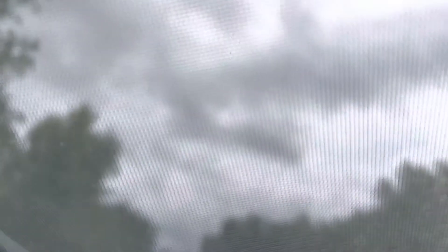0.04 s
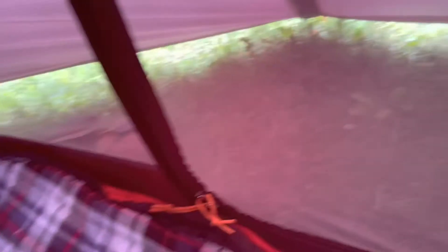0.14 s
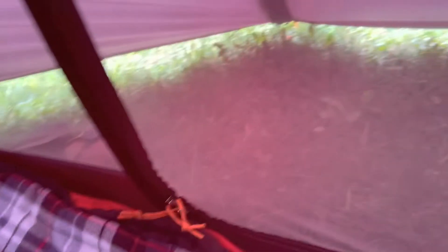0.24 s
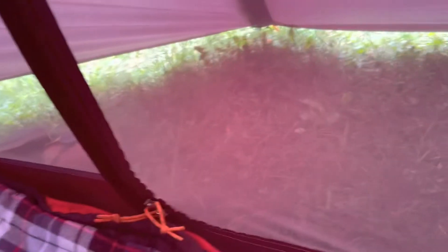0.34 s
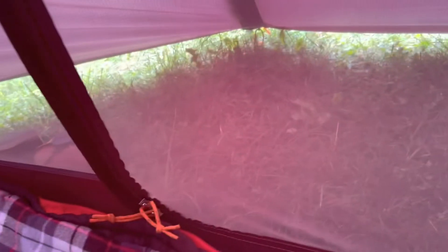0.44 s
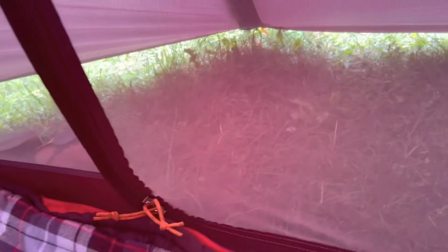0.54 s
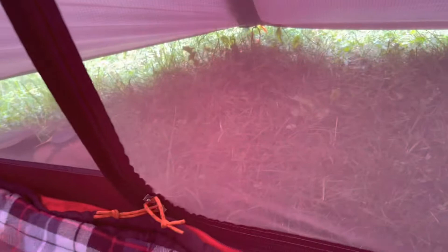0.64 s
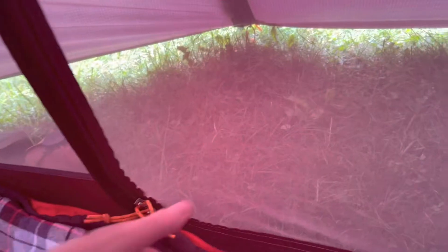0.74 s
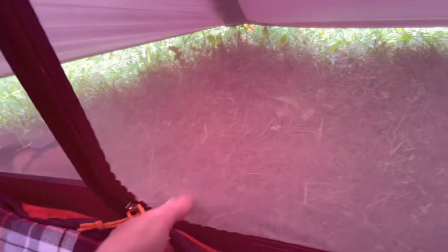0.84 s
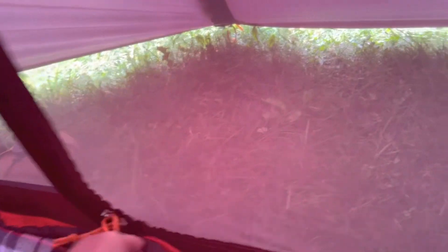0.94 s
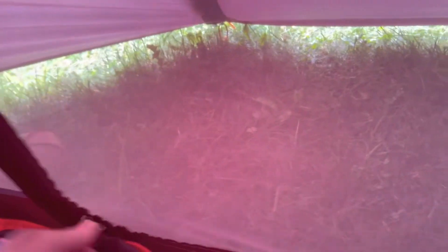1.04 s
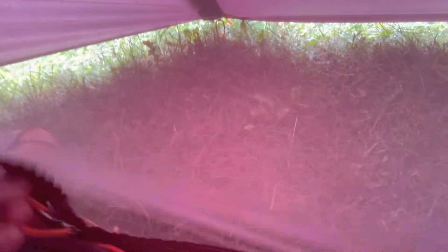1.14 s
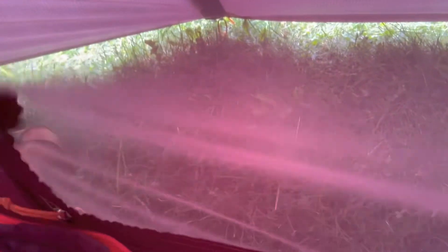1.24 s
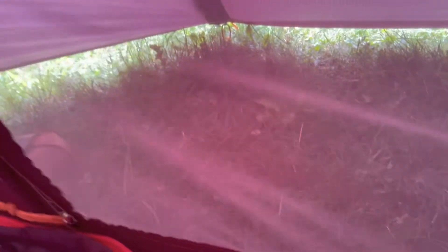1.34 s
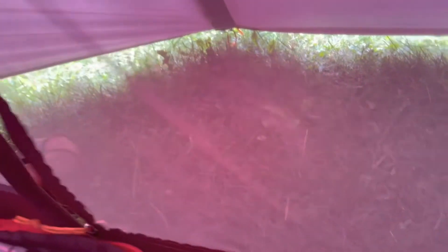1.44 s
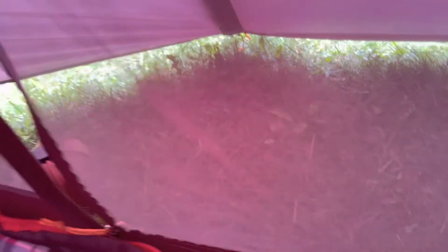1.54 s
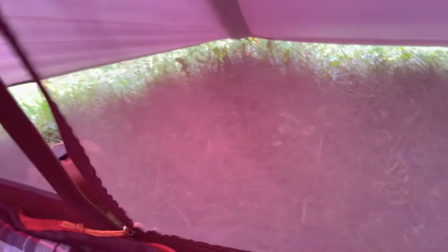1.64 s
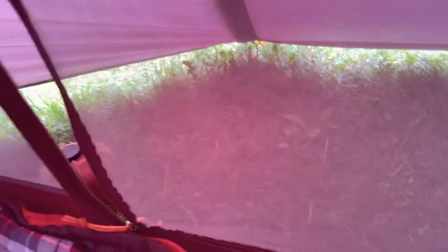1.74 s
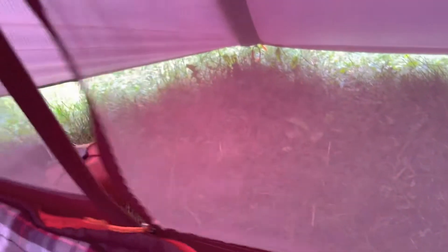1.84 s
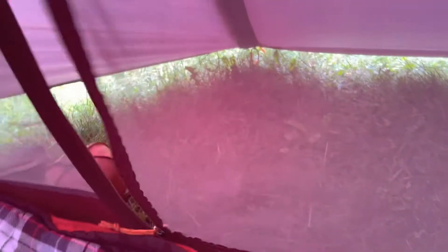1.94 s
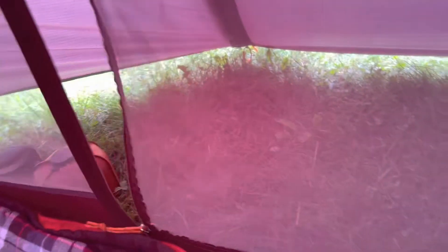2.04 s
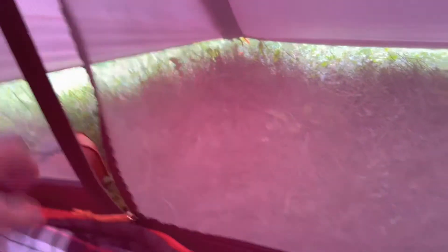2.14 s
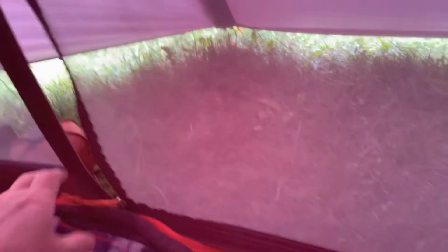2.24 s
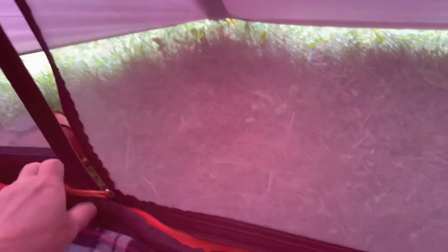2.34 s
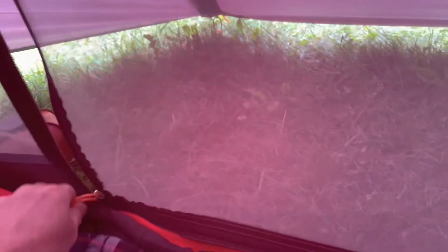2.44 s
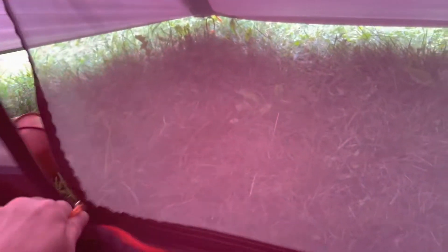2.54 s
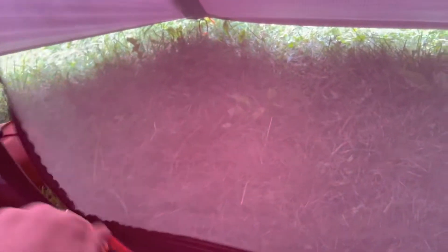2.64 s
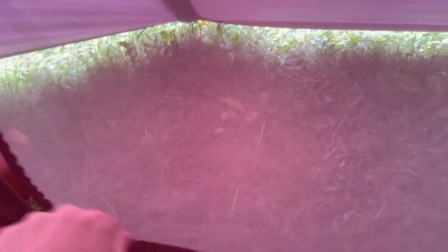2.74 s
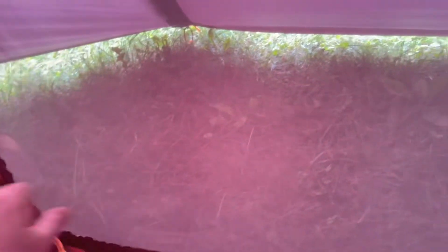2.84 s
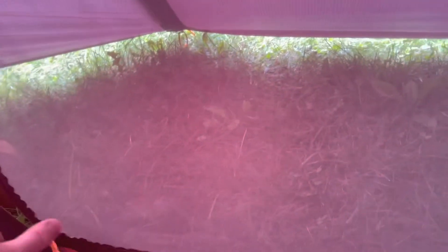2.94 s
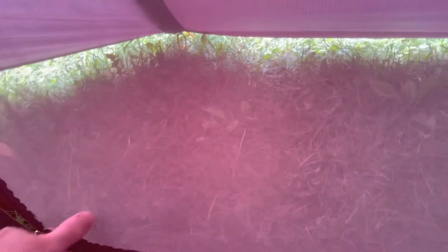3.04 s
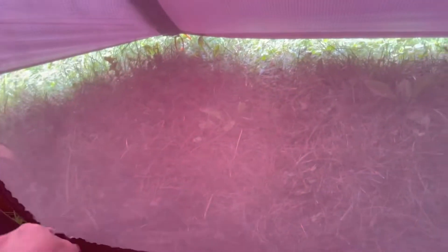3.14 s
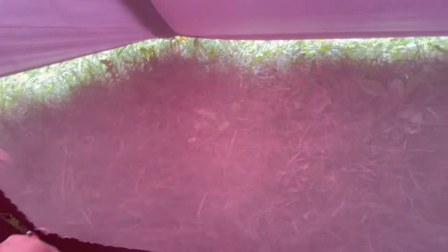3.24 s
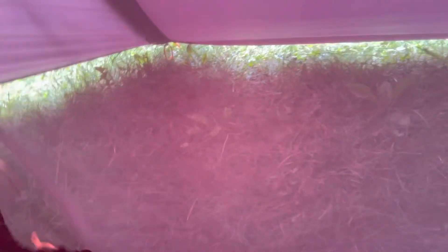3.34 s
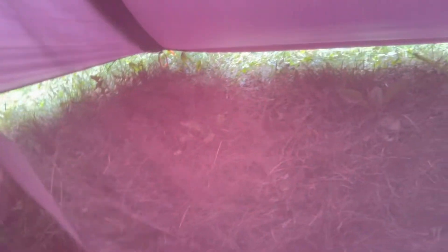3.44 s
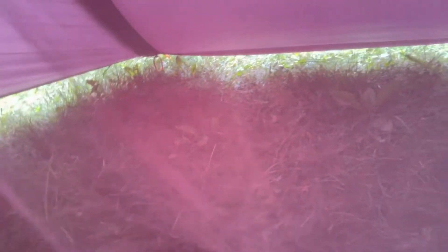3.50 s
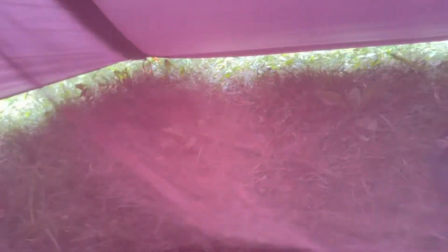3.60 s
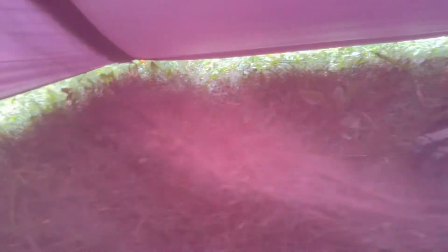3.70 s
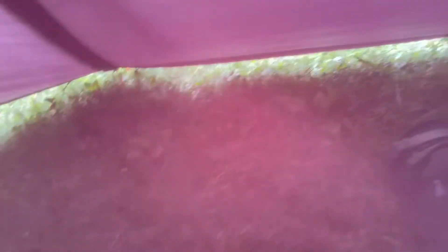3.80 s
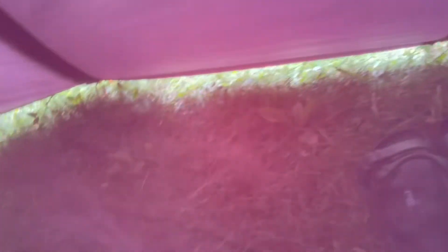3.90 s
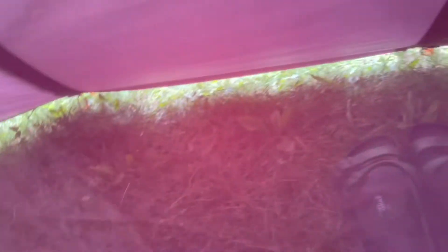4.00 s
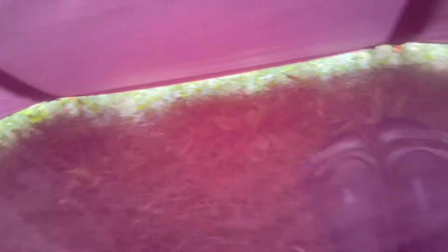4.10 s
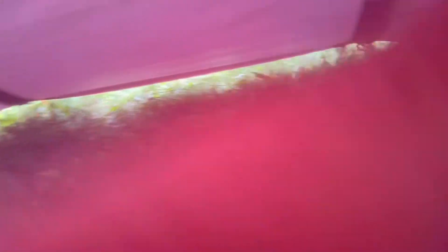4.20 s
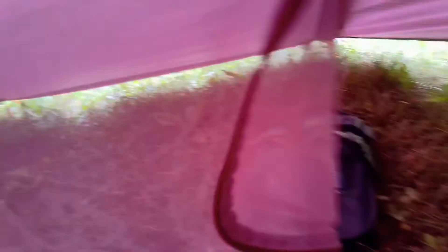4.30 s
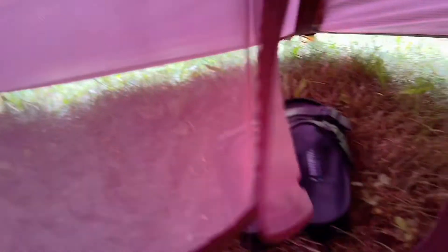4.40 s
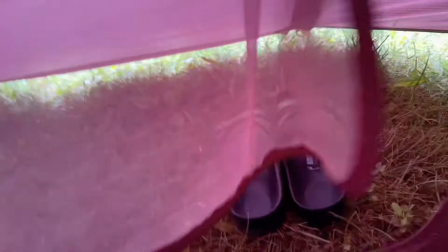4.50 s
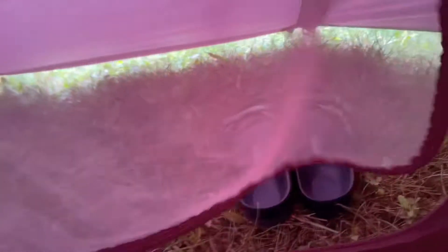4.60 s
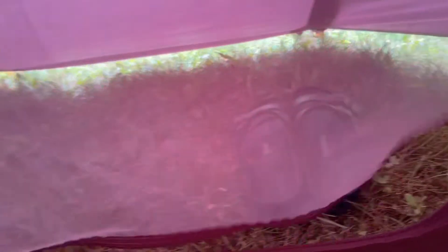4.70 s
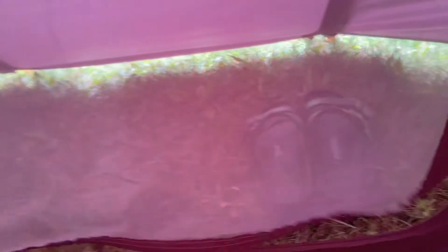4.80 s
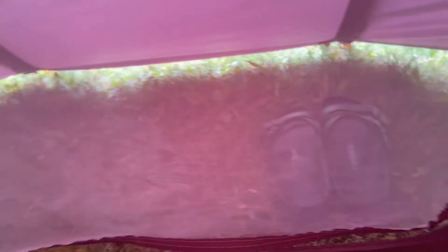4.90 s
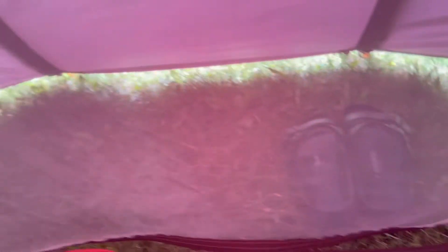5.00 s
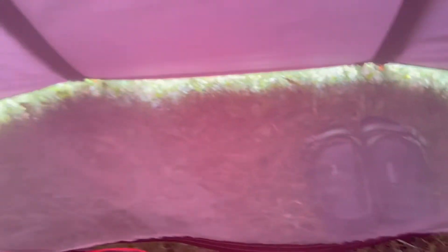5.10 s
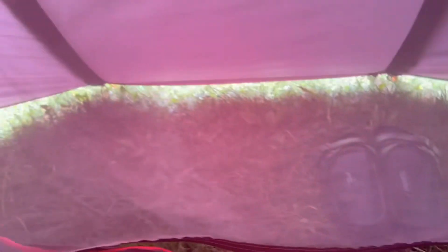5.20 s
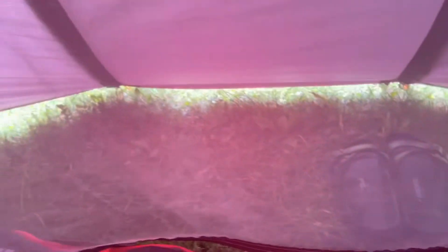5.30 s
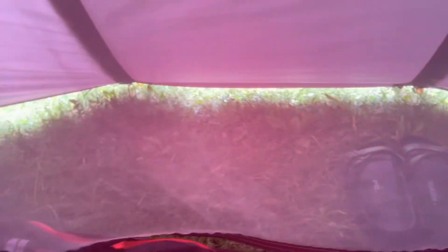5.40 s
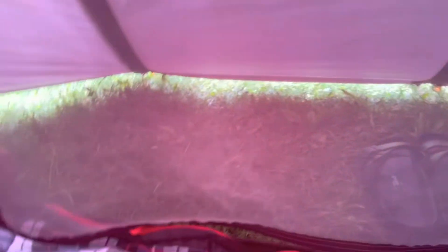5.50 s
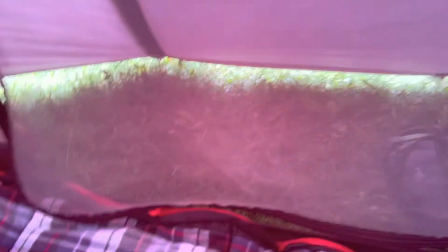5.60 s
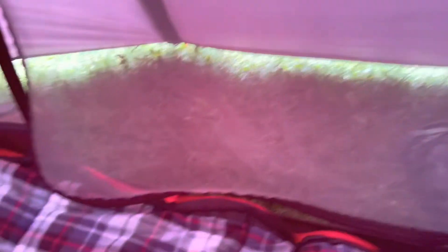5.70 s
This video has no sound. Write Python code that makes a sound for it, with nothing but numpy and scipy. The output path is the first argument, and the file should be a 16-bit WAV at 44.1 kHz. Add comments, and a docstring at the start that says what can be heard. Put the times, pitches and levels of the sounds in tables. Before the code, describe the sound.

A tent door zipper is ripped open in three rasping, humming strokes, with nylon rustles, cloth thumps and a faint low outdoor rumble.

```python
"""A low outdoor rumble with a faint hiss is heard first; at once nylon rustles, cloth snaps and a bird chirps.
Then the zipper of a tent's mesh door is pulled open in three strokes that speed up and slow down.
Each tooth tugs the tape, so the fabric sings at the tooth rate, and clicks in the rasping slider.
Rubbing, crumpling and the heaving wall are shaped noise; thuds and chirps are sines; scuffs are runs of slips."""
import sys
import numpy as np
from scipy import signal
from scipy.fft import rfft, irfft, next_fast_len
from scipy.io import wavfile
from scipy.ndimage import uniform_filter1d

SR = 44100
rng = np.random.default_rng(int(sys.argv[2]) if len(sys.argv) > 2 else 0)


def wav_record(signal):
    """Record a signal, one row per channel, as 16-bit PCM in the file named by sys.argv[1]."""
    frames = np.transpose(np.atleast_2d(signal))
    bounded = np.clip(frames, -1, 1)
    # unit amplitude maps onto the largest positive 16-bit level
    quanta = np.round(bounded * 32767).astype(np.int16)
    wavfile.write(sys.argv[1], SR, quanta)


N = 253575
TIME = np.arange(N) / SR   # s

# In every spectrum the levels are relative: density_db is per Hz.
# outdoor air: freq_hz, density_db
AIR_SPECTRUM = [(15, -47), (25, -51), (43, -6), (92, -2.5), (149, -10), (242, -16.5), (335, -18.5),
                (373, -21), (575, -21.5), (734, -25), (2840, -28.5), (3820, -30), (5280, -34),
                (12500, -57.5), (16000, -52)]
AIR_DB = -48.5
# likeness of the two sides in diffuse noise: freq_hz, correlation
SIDE_CORRELATION = [(60, 1), (250, 0.99), (500, 0.48), (1000, 0.25), (2000, 0.53), (5000, 0.023),
                    (14000, 0.19)]

# nylon slides over nylon: start_s, attack_s, hold_s, release_s, brush_db (relative), swish_db (relative)
RUBS = [ (.085, 0.011, .31, 0.071, -59, -67), (.22, 0.14, .02, .04, -75, -52.5),
        (.55, .03, 0.098, 0.14, -64, -84), (.68, 0.04, 0.071, 0.21, -49.5, -46),
        (.92, 0.043, 0.047, 0.035, -52, -47.5), (1.81, 0.033, 0.027, 0.064, -51.5, -57.5),
        (2.223, 0.018, 0.22, 0.062, -59.5, -59.5), (2.32, 0.02, 0.22, 0.043, -59, -61.5),
        (2.575, 0.0088, 0.0093, .04, -54, -64), (2.7, 0.06, .03, 0.092, -67, -76),
        (2.98, 0.021, .04, 0.25, -58.5, -72), (3.795, 0.0033, 0.004, 0.017, -47, -52),
        (3.8, .01, 0.078, .05, -60, -69), (3.86, 0.066, 0.031, 0.057, -52, -46.5),
        (4.45, .045, .015, 0.068, -54, -61), (4.55, 0.033, 0.35, .05, -67.5, -78),
        (4.873, .006, .02, 0.13, -48, -47), (4.93, 0.037, 0.13, 0.74, -43.5, -41),
        (5.29, 0.068, 0.033, 0.21, -45, -52), (5.57, 0.048, 0.021, 0.12, -46, -40.5),
        (5.68, 0.046, .05, .05, -53.5, -72)]
# rubbed nylon, body of the sound: freq_hz, density_db
BRUSH_SPECTRUM = [(400, -2.5), (900, -0.5), (1500, -4), (2900, 1.5), (4500, -1.5), (6500, -0.5),
                  (9000, -8.5), (14000, -47)]
# rubbed nylon, high swish: freq_hz, density_db
SWISH_SPECTRUM = [(4000, -29), (6500, -3.5), (8300, 0), (10000, -3.5), (12000, 0.5), (14000, -3.5),
                  (16000, -3)]
# the loose door crumples: start_s, attack_s, hold_s, release_s, level_db (relative)
FOLDS = [(.085, .01, 0.28, 0.074, -50.5), (4.873, .004, 0.0068, 0.042, -39.5),
         (4.985, 0.022, 0.21, 0.6, -42.5), (5.35, 0.019, 0.041, 0.12, -37), (5.6, 0.06, 0.025, 0.19, -44.5)]
# crumpling door: freq_hz, density_db
FOLD_SPECTRUM = [(90, 4.5), (180, -2.5), (350, -1.5), (700, -8), (1400, -17), (3000, -27.5)]
RELEASE_DB = 20   # the fall during one release time

# the cloth snaps taut: start_s, thud_db, thud_hz, snap_db, t60_s
TUGS = [(0.11, -42, 194, -56, 0.044), (.741, -35, 540, -37, 0.012), (2.587, -65, 900, -51, 0.027),
        (3.763, -30, 370, -56, .035), (3.801, -26.5, 320, -49, 0.027), (4.4, -40, 900, -31, 0.022),
        (3.903, -26.5, 398, -35.5, 0.027), (3.937, -21, 177, -44, 0.048), (3.956, -14, 170, -53, 0.021),
        (4.45, -21, 217, -60, 0.037), (4.877, -30, 556, -47, 0.017), (4.996, -36, 261, -54, 0.066),
        (5.362, -30, 146, -48, 0.076), (5.4, -32, 350, -55.5, 0.053)]
# bright snap of the taut cloth: freq_hz, density_db
SNAP_SPECTRUM = [(200, 0), (900, -2), (1600, -7), (4000, -5), (15000, -15)]

# bird chirps: start_s, level_db
CHIRPS = [(.135, -51.5), (.206, -55), (.276, -50.5), (.345, -52), (.416, -52), (0.49, -51.5), (.566, -50.5),
          (0.641, -51.5), (0.719, -52)]
CHIRP_S, CHIRP_TOP_HZ, CHIRP_FALL_HZ = 0.049, 6060, 1720   # each chirp strays a little from these pitches
CHIRP_BEND = 1.6   # the fall steepens as this power of time

# force of the hand, one curve per stroke: time_s, slider_db (relative), tape_tone_db (relative)
PULLS = [
    [(1.08, -62, -48), (1.15, -44.5, -35.5), (1.2, -42.5, -29), (1.295, -37.5, -27), (1.34, -35, -41.5),
     (1.44, -40.5, -44.5), (1.58, -45.5, -45), (1.66, -53.5, -46), (1.77, -71.5, -45.5)],
    [(3.25, -64, -62), (3.3, -47, -57), (3.375, -37.5, -35), (3.41, -36.5, -50), (3.49, -37.5, -39.5),
     (3.58, -42.5, -35.5), (3.69, -44, -32), (3.745, -40.5, -39), (3.79, -50.5, -44)],
    [(3.905, -52.5, -44), (3.96, -56, -34.5), (4.04, -48.5, -24.5), (4.07, -44, -37), (4.11, -43.5, -27),
     (4.15, -42, -42.5), (4.195, -35, -36.5), (4.245, -38, -47), (4.29, -36, -31), (4.335, -42, -36.5),
     (4.395, -47.5, -39), (4.435, -53, -26), (4.46, -59, -52)],
]
# mean speed of the slider, one curve per stroke: time_s, speed_teeth_per_s
SPEEDS = [
    [(1.08, 150), (1.15, 300), (1.285, 690), (1.335, 1050), (1.39, 1185), (1.45, 1130), (1.53, 1240),
     (1.59, 1160), (1.62, 680), (1.66, 340), (1.77, 126)],
    [(3.26, 226), (3.3, 440), (3.34, 680), (3.39, 855), (3.545, 1045), (3.63, 945), (3.68, 845),
     (3.725, 705), (3.79, 200)],
    [(3.905, 100), (3.96, 135), (4.04, 315), (4.125, 890), (4.17, 980), (4.205, 1125), (4.24, 1120),
     (4.29, 1370), (4.4, 1060), (4.415, 680), (4.445, 620), (4.46, 200)],
]
# each stroke runs on another stretch of the door:
# rattle_db (over the slider level), shudder_teeth_per_s (before its limit), tone_left_minus_right_db
STROKES = [(2, 20, -0.5), (2.5, 7.5, 2.5), (1.5, 32, 1)]
SHUDDER_HZ = 66.94   # mean rate at which the taut door shudders and makes the slider run unevenly
SHUDDER_MOST = .07   # largest share of the speed taken by the shudder
WOBBLE = .013   # the speed wavers at random by this share
ROUGH_SLOW, ROUGH_FAST, SMOOTH_FROM_TEETH_PER_S = .52, .26, 480   # a slow slider catches, a fast one glides
# overtone that the tape favours, one per stroke: multiple of the tooth rate
OVERTONES = [2, 3, 2]
# resonance in which that overtone sings, one per stroke: centre_hz, width_hz, gain_db (relative)
OVERTONE_BANDS = [(2340, 650, -7.5), (3080, 880, 0.5), (2230, 1400, 6)]
# resonance in which the octave of a slow pull sings: freq_hz, gain_db (relative)
OCTAVE_BAND = [(500, -4), (900, -1), (1400, -2.5), (1900, -11), (2400, -28)]
OCTAVE_DB = -3   # over the slider level
TAPE_RING_S = 0.23   # t60
# the tape rubbing slowly: freq_hz, density_db
GROWL_SPECTRUM = [(130, 5), (300, 2), (600, 1), (1000, -4), (1600, -20.5), (3000, -12)]
# slider, body of the rasp: freq_hz, density_db
RATTLE_SPECTRUM = [(150, -17), (400, -13.5), (950, 8.5), (1750, -0.5), (2500, 5), (3600, 0), (6000, -1),
                   (8000, 4), (15000, -23)]
# slider, top of the rasp: freq_hz, density_db
HISS_SPECTRUM = [(2500, -62), (5000, 9), (7000, -5.5), (9800, -0.5), (12000, 6.5), (14000, 3.5),
                 (16000, 2.5)]
# the tape under the slider rings differently in each stroke: centre_hz, width_hz, gain_db
TAPE_RINGS = [(4040, 420, -2.5), (4160, 860, -2), (3810, 440, 5.5)]

# the tent wall heaves under the pull: start_s, attack_s, hold_s, release_s, level_db (relative)
HEAVES = [(1.085, 0.026, 0.098, 0.2, -43.5), (1.23, 0.044, 0.093, 0.2, -36),
          (1.58, 0.085, .09, 0.056, -45.5), (3.785, 0.018, .005, .04, -38), (3.91, 0.038, .08, 0.2, -31.5),
          (4.17, 0.065, .27, 0.077, -33.5), (4.98, 0.028, .005, .04, -39), (5.35, .015, 0.018, 0.15, -39)]
# heaving wall: freq_hz, density_db
WALL_SPECTRUM = [(25, -26), (48, 1), (75, 6.5), (120, 1), (180, -10), (350, -25.5)]

# the slider or pull cord sticks and slips: start_s, length_s, centre_hz, level_db
SCUFFS = [(1.829, 0.061, 1410, -47.5), (2.355, 0.02, 1460, -50.5), (2.409, .032, 1280, -53),
          (2.463, 0.027, 1400, -57), (3.723, 0.056, 950, -37), (3.893, .078, 800, -41.5),
          (4.473, 0.044, 1600, -50)]
# stick-slip drag: multiple of the centre frequency, density_db
SCUFF_SPECTRUM = [(.2, -23), (.55, 12.5), (1, 13), (1.3, 9), (1.7, -25), (2.6, -22), (5, -37)]
SLIPS_PER_S = 150   # typical; wavers at random
SCUFF_ATTACK = .22   # share of a drag's length


def from_db(db):
    """Amplitude ratio: 20 dB is a factor of ten."""
    return 10 ** (np.asarray(db) / 20)


def rms_one(x):
    """Normalisation to unit root-mean-square amplitude."""
    return x / np.sqrt(np.mean(x ** 2) + 1e-20)


def at_hz(points, hz):
    """Linear interpolation of a spectrum on a logarithmic frequency axis."""
    freq, value = np.transpose(points)
    return np.interp(np.log(hz + 1e-3), np.log(freq), value)


def drift(rate):
    """Band-limited fluctuation: random knots, `rate` per second, joined by lines; rms 1."""
    knots = rng.standard_normal(4000)
    return rms_one(np.interp(TIME * rate, np.arange(len(knots)), knots))


def grainy(grain_db):
    """Amplitude modulation: white noise whose strength flickers within milliseconds."""
    return rng.standard_normal(N) * from_db(grain_db * drift(600))


def tint(x, spectrum):
    """Spectral shaping by a linear filter, falling away beyond the spectrum's ends; rms 1."""
    size = next_fast_len(N)
    hz = np.arange(size // 2 + 1) * SR / size
    below = 1 + (.7 * spectrum[0][0] / (hz + 1)) ** 6
    above = 1 + (.7 * hz / spectrum[-1][0]) ** 6
    gain = from_db(at_hz(spectrum, hz)) / np.sqrt(below * above)
    return rms_one(irfft(rfft(x, size) * gain, size)[..., :N])


def noise(spectrum, grain_db):
    """Diffuse field: mid and side noise mixed so that the sides correlate mostly in the bass."""
    size = next_fast_len(N)
    hz = np.arange(size // 2 + 1) * SR / size
    alike = np.clip(at_hz(SIDE_CORRELATION, hz), -1, 1)
    mid, side = rfft([grainy(grain_db), grainy(grain_db)], size)
    both = np.sqrt(1 + alike) * mid + np.sqrt(1 - alike) * side * [[1], [-1]]
    return tint(irfft(both, size)[:, :N], spectrum)


def swells(events, axis=4):
    """Incoherent addition of envelopes: each rises, holds and dies away; their powers add."""
    power = 0
    for row in events:
        start, attack, hold, release = row[:4]
        rise = np.clip((TIME - start) / attack, 0, 1)
        release_times = np.clip((TIME - start - attack - hold) / release, 0, 10)
        power = power + (from_db(row[axis]) * rise * from_db(-RELEASE_DB * release_times)) ** 2
    return np.sqrt(power)


def tail(x, t60, wet_db):
    """Reverberation: convolution with exponentially dying noise, different on each side."""
    t = TIME[:SR // 5]
    paths = rms_one(rng.standard_normal((2, len(t))) * from_db(-60 * t / t60)) / np.sqrt(len(t))
    return x + from_db(wet_db) * signal.fftconvolve(np.atleast_2d(x), paths, axes=1)[:, :N]


def span(rows):
    """Gating: 1 while a curve runs, with short fades outside it."""
    start, end = rows[0][0], rows[-1][0]
    return np.interp(TIME, [start - .015, start, end, end + .015], [0, 1, 1, 0])


def pull(curves, axis=1):
    """Interpolation of one column of the strokes' curves over time."""
    rows = np.concatenate(curves)
    return np.interp(TIME, rows[:, 0], rows[:, axis])


def ringing(x, resonances):
    """Resonance: a two-pole band-pass for the tape, a different one in each stroke."""
    out = 0
    for rows, (hz, width, db) in zip(PULLS, resonances):
        radius = np.exp(-np.pi * width / SR)
        zeros = np.array([1, 0, -1]) * (1 - radius ** 2) / 2
        poles = [1, -2 * radius * np.cos(2 * np.pi * hz / SR), radius ** 2]
        out = out + from_db(db) * span(rows) * signal.lfilter(zeros, poles, x)
    return out


def moving(x, metres, echo_db, count=8):
    """Changing path length: direct sound and cloth reflections whose delays vary as the source travels."""
    out = np.array([np.roll(x, 1), x])   # the right side hears it one sample sooner
    for k in range(2 * count):
        base, angle, turn = rng.uniform([.6, 0, .6], [1.6, 2 * np.pi, 1.6])
        path_m = base + .55 * np.sin(angle + 2 * turn * metres)
        echo = np.interp(TIME - path_m / 343, TIME, x)
        out[k % 2] += from_db(echo_db) / np.sqrt(count) * rng.choice([-1, 1]) * echo
    return out


def flutter(flutter_db=-0.5, turn=0.1, rate=38):
    """Uneven radiation of slack cloth: gain and phase (radians) waver separately on each side."""
    swell, angle = np.array([[drift(rate) for _ in range(2)] for _ in range(2)])
    return rms_one(from_db(flutter_db * swell)), turn * angle


def outdoor_air():
    """Steady broadband noise, strongest in the bass: a low rumble with a faint hiss."""
    return from_db(AIR_DB) * noise(AIR_SPECTRUM, grain_db=1.2)


def rubbing():
    """Sliding friction: nylon brushes and swishes under the uneven pressure of a hand."""
    pressure = from_db(drift(35))
    brush = from_db(3) * swells(RUBS, axis=4) * noise(BRUSH_SPECTRUM, grain_db=0.35)
    swish = from_db(2) * swells(RUBS, axis=5) * noise(SWISH_SPECTRUM, grain_db=0.7)
    return pressure * (brush + swish)


def crumpling():
    """Irregular buckling of the loose door's folds: grainy noise of wavering strength."""
    return from_db(-1.5 + drift(50)) * swells(FOLDS) * noise(FOLD_SPECTRUM, grain_db=3)


def tugs():
    """Damped free vibration: cloth pulled taut gives a decaying thud and a short bright snap."""
    thud, snap_gain = np.zeros(N), np.zeros(N)
    t = TIME[:SR // 6]
    for start, thud_db, hz, snap_db, t60 in TUGS:
        at = round(start * SR)
        decay = from_db(-60 * t / t60)
        thud[at:at + len(t)] += from_db(thud_db) * decay * np.sin(2 * np.pi * hz * t)
        snap_gain[at:at + len(t)] += from_db(snap_db) * decay
    return thud + snap_gain * noise(SNAP_SPECTRUM, grain_db=2.5)


def bird():
    """Frequency modulation: one small whistle, repeated, falls faster as it ends."""
    out = np.zeros(N)
    u = np.arange(int(CHIRP_S * SR)) / (CHIRP_S * SR)   # share of the chirp elapsed
    envelope = np.sin(np.pi * u ** 0.81) ** 2
    for start, db in CHIRPS:
        stray = 1 + 0.017 * rng.standard_normal()
        hz = (CHIRP_TOP_HZ - CHIRP_FALL_HZ * u ** CHIRP_BEND) * stray
        at = round(start * SR)
        out[at:at + len(u)] += from_db(db) * envelope * np.sin(2 * np.pi * np.cumsum(hz) / SR)
    return tail(out, t60=.12, wet_db=-9)


def tape_tone(travel, tug, tape, slider, pace, lean_db, stroke):
    """Periodic excitation: the tape sings at the tooth rate, its octave and one favoured overtone."""
    lean = from_db(lean_db * [[.5], [-.5]])
    lean = lean / np.sqrt(np.mean(lean ** 2, axis=0))
    swell, angle = flutter()
    high_swell, high_angle = flutter(flutter_db=0.5, turn=0.9, rate=70)
    side_phase = np.array([[-.3], [.3]])
    tone = swell * lean * np.sin(2 * np.pi * travel + angle + side_phase)
    multiple = np.array(OVERTONES)[stroke]
    high_side_phase = np.array([[.7], [-.7]])
    overtone = high_swell * np.sin(2 * np.pi * multiple * travel + high_angle + high_side_phase)
    # the overtone passes its band twice, for steep sides
    overtone = ringing(overtone, [(hz, width, 0) for hz, width, _ in OVERTONE_BANDS])
    overtone = ringing(overtone, OVERTONE_BANDS)
    octave_gain = from_db(OCTAVE_DB + at_hz(OCTAVE_BAND, 2 * pace))
    octave = octave_gain * np.sin(4 * np.pi * travel + high_angle)
    return np.sqrt(2) * tug * (from_db(-1.5) * tape * tone + slider * (octave + overtone))


def tooth_clicks(travel, strength, speed):
    """Impulse train: one click per tooth, of random strength, with its slow average removed."""
    passed = np.diff(np.floor(np.maximum.accumulate(travel)), prepend=0)
    clicks = passed * from_db(0.5 * strength) / np.sqrt(speed)
    return rms_one(clicks - uniform_filter1d(clicks, size=600))


def rasp(clicks, friction, rough, metres, spectrum):
    """Impacts and friction share the power by roughness, heard from the travelling slider."""
    share = np.clip(1 - rough, 0, 1)   # a rough pull buries the clicks in friction
    source = np.sqrt(share) * clicks + np.sqrt(1 - share) * friction
    return tint(moving(source, metres, echo_db=6.5), spectrum)


def zipper():
    """Periodic contact: passing teeth tug the tape and click in the slider, with friction in between."""
    running = np.array([span(rows) for rows in PULLS])
    rattle_db, shudder, lean_db = np.transpose(STROKES) @ running
    pace = pull(SPEEDS)
    slider = running.sum(0) * from_db(pull(PULLS, axis=1) + 1.24 * drift(45))
    tape = running.sum(0) * from_db(pull(PULLS, axis=2))
    # the slower the pull, the rougher it is and the more the door's shudder disturbs it
    rough = ROUGH_FAST + (ROUGH_SLOW - ROUGH_FAST) / (1 + (pace / SMOOTH_FROM_TEETH_PER_S) ** 2)
    depth = np.minimum(shudder / pace, SHUDDER_MOST)
    shake = np.sin(2 * np.pi * np.cumsum(SHUDDER_HZ * (1 + .12 * drift(40))) / SR)
    speed = pace * (1 + WOBBLE * drift(180) + depth * (shake + .5 * drift(250)))
    teeth = np.cumsum(speed) / SR
    # no two teeth are alike in strength or spacing
    strength, offset = rng.standard_normal((2, 8000))
    travel = teeth + 0.018 * np.interp(teeth, np.arange(len(offset)), offset)
    uneven = rough * np.interp(teeth, np.arange(len(strength)), strength)
    tug = (1 + uneven + 6 * depth * shake) / np.sqrt(1 + rough ** 2)
    # friction is strongest just after a tooth enters
    friction = rms_one(grainy(1.36) * np.exp(-1.6 * (travel % 1)))

    sung = tape_tone(travel, tug, tape, slider, pace, lean_db, running.argmax(axis=0))
    growl = from_db(-5.5) * rough * tape * tint(friction, GROWL_SPECTRUM)
    clicks = tooth_clicks(travel, strength[teeth.astype(int)], speed)
    metres = teeth * .0014   # tooth spacing in m
    rattle = from_db(rattle_db) * rasp(clicks, friction, rough, metres, RATTLE_SPECTRUM)
    hiss = from_db(-0.5) * rasp(clicks, friction, rough, metres, HISS_SPECTRUM)
    rasping = slider * (rattle + ringing(rattle, TAPE_RINGS) + hiss)
    return tail(sung + growl, t60=TAPE_RING_S, wet_db=-13) + rasping


def heaving():
    """Low-frequency radiation from a large surface: the tent wall heaves as swells of deep noise."""
    return from_db(-3) * swells(HEAVES) * noise(WALL_SPECTRUM, grain_db=0)


def scuffs():
    """Stick-slip friction: short, uneven runs of slips, each run around its own pitch."""
    since_slip = np.cumsum(SLIPS_PER_S * from_db(3 * drift(100))) / SR % 1   # share of a slip cycle
    slips = rms_one(np.exp(-2.2 * since_slip))
    out = 0
    for start, length, centre_hz, db in SCUFFS:
        end = start + length
        gate = np.interp(TIME, [start, start + SCUFF_ATTACK * length, end, end + .015], [0, 1, 1, 0])
        spectrum = [(multiple * centre_hz, gain) for multiple, gain in SCUFF_SPECTRUM]
        out = out + from_db(db) * gate * slips * noise(spectrum, grain_db=0)
    return out


def scene():
    """Superposition: zipper and cloth close by, bird and air beyond."""
    cloth = rubbing() + crumpling() + tugs() + heaving()
    return outdoor_air() + cloth + bird() + zipper() + scuffs()


def record(dry):
    """Low-pass filtering: an elliptic filter cuts the top steeply above 15850 Hz."""
    return signal.sosfilt(signal.ellip(12, .1, 90, 15850, fs=SR, output="sos"), dry)


dry = scene()
out = record(dry)
wav_record(out)
```